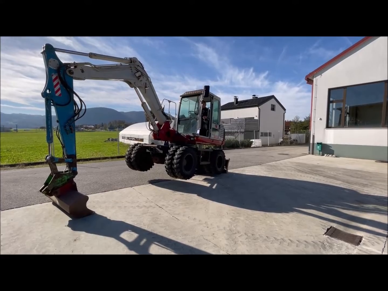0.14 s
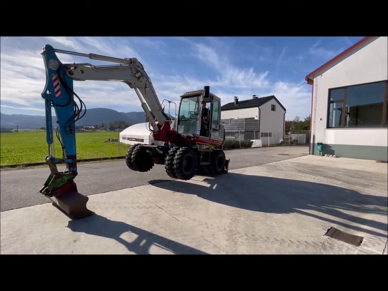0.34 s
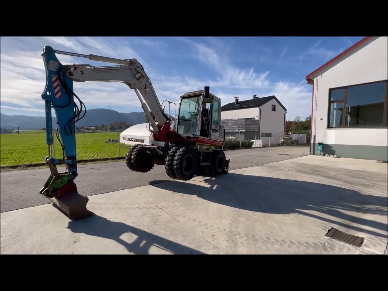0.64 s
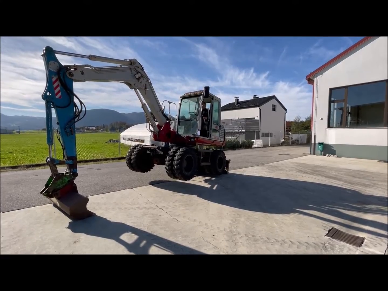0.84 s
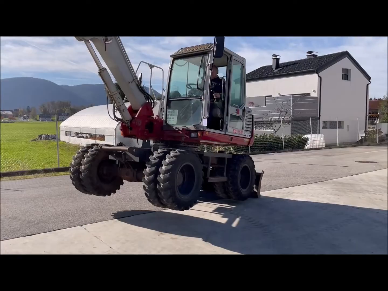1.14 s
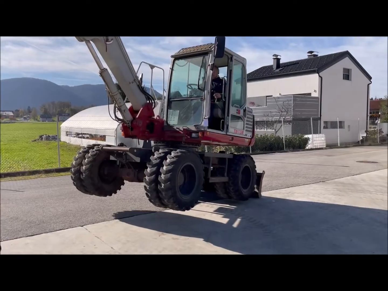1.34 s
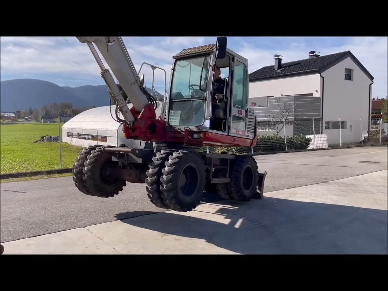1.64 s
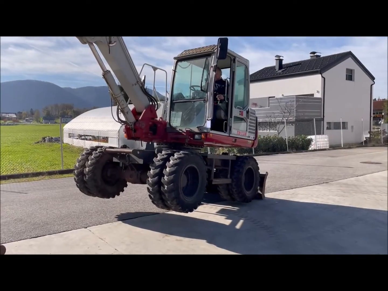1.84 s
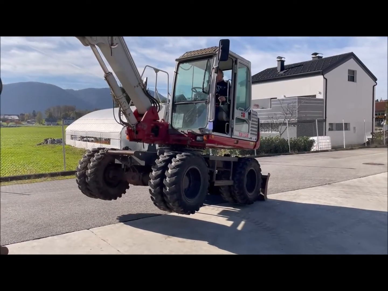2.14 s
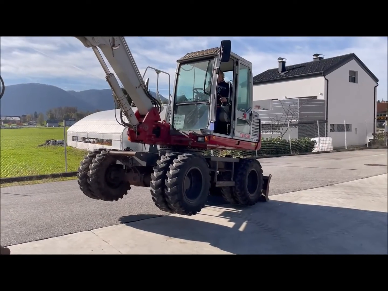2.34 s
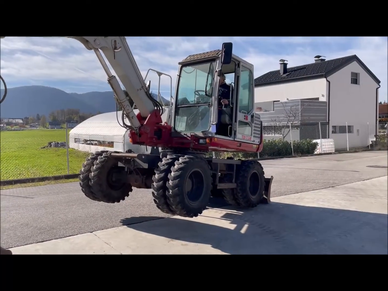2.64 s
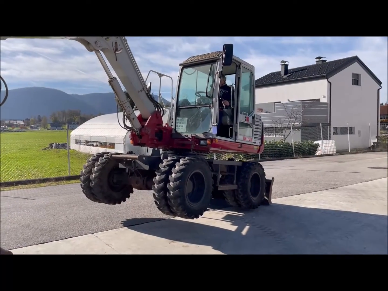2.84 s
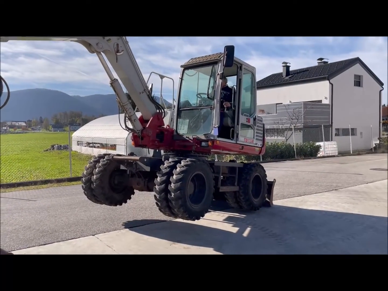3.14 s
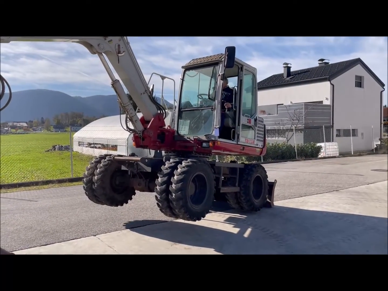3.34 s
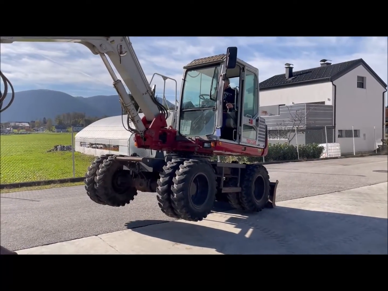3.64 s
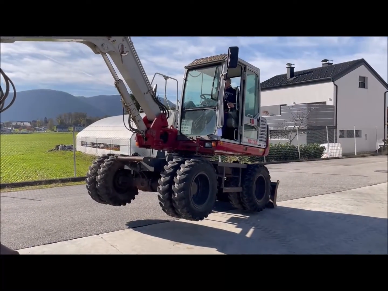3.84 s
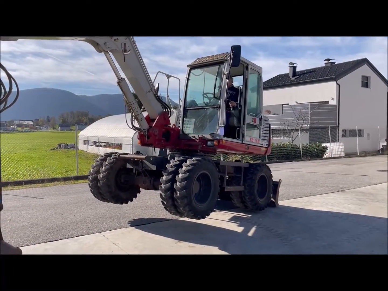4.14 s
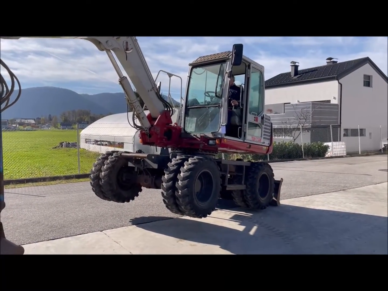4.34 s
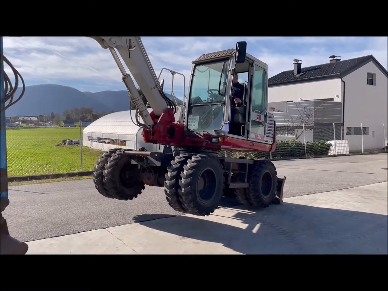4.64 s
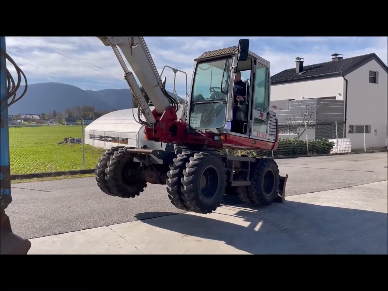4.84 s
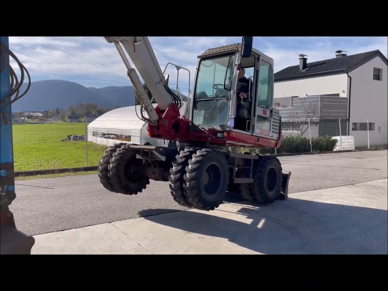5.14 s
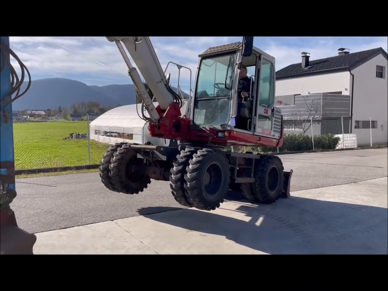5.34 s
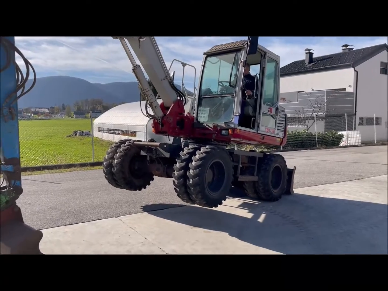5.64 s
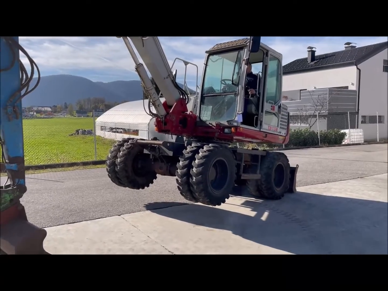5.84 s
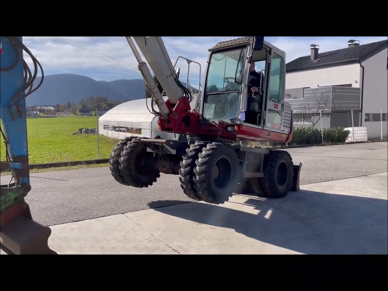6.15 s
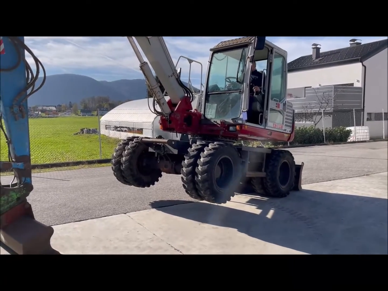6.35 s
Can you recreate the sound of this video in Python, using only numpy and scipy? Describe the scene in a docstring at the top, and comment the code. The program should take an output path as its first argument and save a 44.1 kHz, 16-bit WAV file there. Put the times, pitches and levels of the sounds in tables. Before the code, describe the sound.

A raised wheeled excavator runs with a steady rattling diesel beat, heard in stereo in the open air with brief soft wind buffets. The pump strains and hisses early on, the engine sagging slightly, with a few small ticks and a dull knock from the bucket. After quieter running, the pump strains again and the nearby steel bucket skids in a loud grinding judder with deep thumps, brief squeaks and bright stone pings.

```python
"""A four-cylinder diesel throbs and clatters: harmonics of the firing rate plus struck, damped modes.
It belongs to a wheeled excavator holding itself off a concrete yard on its bucket; its speed sags
and its pump whines and hisses under load, while gusts of filtered noise buffet the microphone.
A few faint slips of the bucket precede a long judder across the concrete: random grains crack
and grind, and narrow bands of noise and decaying sines make the steel clank, boom and ring."""
import sys
import numpy as np
from scipy import signal
from scipy.fft import rfft, irfft
from scipy.io import wavfile
from scipy.ndimage import uniform_filter1d

SR = 44100
rng = np.random.default_rng(int(sys.argv[2]) if len(sys.argv) > 2 else 0)


def digitize_waveform(pressure):
    """Quantize a signal to 16-bit integers and store it at the path in sys.argv[1].

    Rows of a 2-D input are taken as channels; values are limited to [-1, 1].
    """
    field = np.atleast_2d(pressure).T
    bounded = np.clip(field, -1, 1)
    quanta = np.round(bounded * 32767).astype(np.int16)
    wavfile.write(sys.argv[1], SR, quanta)


N = 286650
TIME = np.arange(N) / SR  # s
FREQS = np.arange(N // 2 + 1) * SR / N  # Hz


def from_db(db):
    """Logarithmic level: 20 dB is a factor of ten in amplitude."""
    return 10 ** (np.asarray(db) / 20)


def rms_one(x):
    """Power normalisation: scale to a root mean square of 1."""
    return x / np.sqrt(np.mean(x ** 2) + 1e-20)


def in_time(rows):
    """Linear interpolation: each column of a curve at every sample."""
    s, *columns = np.transpose(rows)
    return [np.interp(TIME, s, column) for column in columns]


def over_hz(points):
    """Interpolation along logarithmic frequency: a spectrum table at every frequency."""
    hz, value = np.transpose(points)
    return np.interp(np.log(FREQS + 1), np.log(hz), value)


def drift(rate_hz):
    """Low-pass filtered noise: a slow random fluctuation of rms 1."""
    spectrum = rfft(rng.standard_normal(N)) / (1 + (FREQS / rate_hz) ** 2)
    return rms_one(irfft(spectrum, N))


def swell(at_s, hold_s, rise_db_per_s, fall_db_per_s):
    """Exponential growth and decay: a gain rises to 1 at a moment, holds and dies away."""
    before_s = np.maximum(at_s - TIME, 0)
    after_s = np.maximum(TIME - at_s - hold_s, 0)
    return from_db(-rise_db_per_s * before_s - fall_db_per_s * after_s)


def noise():
    """Incoherent sources: two unrelated white noises."""
    return rng.standard_normal((2, N))


def grit(per_s, spread_db):
    """Granular impact noise: random clicks of random height, with an adjustable spread of sizes."""
    sizes = from_db(spread_db * np.minimum(rng.exponential(1, N), 4))
    return noise() * sizes * (rng.random(N) < per_s / SR)


def ring(clicks, hz, t60):
    """Damped resonator: a unit click sets off a decaying sine of initial height 1."""
    radius = from_db(-60 / (t60 * SR))
    angle = 2 * np.pi * hz / SR
    return signal.lfilter([0, np.sin(angle)], [1, -2 * radius * np.cos(angle), radius ** 2], clicks + 1e-18)


# scattered sound of the machine against its direct sound at two ports: columns f/Hz, level/dB
SPREAD = [(40, 6), (150, -10.5), (350, -12), (600, -4.5), (1100, -2.5), (1550, -7.5), (2200, -7),
          (3000, -5.5), (5000, -6), (8000, -31), (15000, -12)]


def colour(pair, spectrum, peaks=(), spread=SPREAD):
    """Resonant filtering: shape direct and scattered signals into left and right; joint rms 1."""
    low_hz, high_hz = spectrum[0][0], spectrum[-1][0]
    gain = from_db(over_hz(spectrum))
    gain = gain / (1 + (FREQS / high_hz / 1.3) ** 6)
    gain = gain / (1 + (low_hz / 1.5 / (FREQS + 1)) ** 4)
    for hz, width, db in peaks:
        gain = gain * (1 + (from_db(db) - 1) / np.hypot(1, 2 * (FREQS - hz) / width))
    scattering = [np.ones(len(FREQS)), from_db(over_hz(spread))]
    mid, side = irfft(rfft(pair) * gain * scattering, N)
    return rms_one(np.array([mid + side, mid - side]))


def strikes(cycles, place, uneven_db, jitter_s):
    """Periodic impact: a click at one crank angle of every cycle, uneven in time and force."""
    s = np.interp(np.arange(int(cycles[-1]) + 1) + place % 1, cycles, TIME)
    chance = rng.standard_normal((len(s), 2))
    at = np.round((s + jitter_s * chance[:, 0]) * SR).astype(int)
    inside = (at >= 0) & (s < TIME[-1]) & (at < N)
    clicks = np.zeros(N)
    clicks[at[inside]] = from_db(uneven_db * chance[inside, 1])
    return clicks


def contacts(cycles, places, t60):
    """Periodic impact noise: each crank angle repeats one short decaying noise burst of its own."""
    age = TIME[:SR // 20]
    out = np.zeros((2, N + SR // 20))
    for place in places:
        tick = rng.standard_normal((2, len(age))) * from_db(-60 * age / t60 + rng.normal(0, 1))
        clicks = strikes(cycles, place, uneven_db=0.5, jitter_s=.00001)
        for at in np.flatnonzero(clicks):
            out[:, at:at + len(age)] += clicks[at] * tick
    return out[:, :N]


# effort of the hydraulic pump, which loads the engine: columns t/s, load (0-1)
LOAD = [(0, .18), (.4, .13), (.75, .37), (1.06, .38), (1.6, .94), (2.3, .98), (2.41, .5), (2.82, .13),
        (3.14, .13), (3.84, .52), (4.15, .19), (5.1, .06), (5.3, .95), (6.1, .85), (6.4, .2)]
FREE_FIRINGS_PER_S, FULL_LOAD_SAG_PER_S = 47.6, 1.6


def crank(load):
    """Speed droop: load lowers the firing rate, whose integral counts the firings."""
    firing_hz = FREE_FIRINGS_PER_S - FULL_LOAD_SAG_PER_S * load
    return np.cumsum(firing_hz * (1 + .0004 * drift(4))) / SR


# exhaust tones: columns multiple of the firing rate, relative level/dB
EXHAUST = [(1.5, -26), (2, 3.5), (2.5, -19), (3, -9), (3.5, -25), (4, -11), (5, -30.5), (6, -20),
           (7, -23.5), (8, -24), (9, -22.5)]
# base levels and their rise at full load, dB
EXHAUST_DB, EXHAUST_RISE_DB = -26.5, 4
THROB_DB, THROB_RISE_DB = -26.5, 1


def exhaust(firings, load):
    """Harmonic synthesis: a throb at the firing rate under pipe tones that swell more with load."""
    tones = 0
    for order, db in EXHAUST:
        tones = tones + from_db(db + .7 * drift(6)) * np.sin(2 * np.pi * order * firings)
    throb_db = THROB_DB + THROB_RISE_DB * load + drift(6.9)
    throb = from_db(throb_db) * np.cos(2 * np.pi * firings)
    return from_db(EXHAUST_DB + EXHAUST_RISE_DB * load) * tones + throb


# hum of the engine block: columns multiple of the firing rate, level/dB
HUM = [(11.5, -42.5), (12.5, -40), (13, -41), (13.5, -44.5), (14, -41), (16, -50), (18.5, -57), (19, -50),
       (20, -51.5)]


def hum(firings):
    """Engine-order radiation: the block hums at fixed multiples of the firing rate."""
    out = 0
    for order, db in HUM:
        phase = 2 * np.pi * (order * firings + rng.random())
        out = out + from_db(db + drift(5.8)) * np.sin(phase)
    return out


WHISTLE_HZ, WHISTLE_WANDER_HZ = 1527, 4.14
WHISTLE_DB, WHISTLE_FLICKER_DB = -43, 0.5


def whistle():
    """Frequency and amplitude modulation: a thin tone, independent of load, wanders and flickers."""
    turns = np.cumsum(WHISTLE_HZ + WHISTLE_WANDER_HZ * drift(12.5)) / SR
    level_db = WHISTLE_DB + WHISTLE_FLICKER_DB * drift(35) + 1.1 * drift(1.2)
    return from_db(level_db) * np.sin(2 * np.pi * turns)


# valve gear and injection clatter: columns f/Hz, density level/dB per Hz
CLATTER = [(150, 5.5), (220, 1.5), (370, -1.5), (600, 4), (820, -7.5), (1200, -5.5), (1600, -3),
           (1850, -7.5), (2400, -10), (2750, -11.5), (3500, -15), (5000, -21), (8000, -32.5)]
# ringing panels: columns f/Hz, width/Hz, level/dB
PANELS = [(345, 54, 1.5), (533, 20, 0.5), (900, 31, 9), (1260, 36, -5.5), (1620, 240, 3.5), (1880, 83, -13),
          (2140, 98, 2.5), (2800, 7.8, -0.5)]
CLATTER_DB, CLATTER_RISE_DB = -36, 0.5  # base level and its rise at full load


def clatter(firings, load, t60=0.036, count=20):
    """Impact excitation of resonances: twenty contacts a cycle rattle the panels."""
    places = (np.arange(count) + rng.random(count)) / count
    rattle = colour(contacts(firings / 4, places, t60), CLATTER, PANELS)
    surge = from_db(0.87 * np.cos(2 * np.pi * (firings - .15)))  # strongest just after each firing
    return from_db(CLATTER_DB + CLATTER_RISE_DB * load) * surge * rattle


# knocks of the four cylinders: columns place in the four-stroke cycle (0-1), force level/dB
KNOCKS = [(0.015, -0.5), (0.264, 0.3), (0.514, 1), (0.765, -0.8)]
# modes of the block: columns f/Hz, t60/s, lag after the knock/s,
# level/dB for an outer cylinder, level/dB for an inner one
BLOCK = [(346, .022, 0.0013, -38.5, -30), (449, 0.022, 0.00082, -39.5, -30.5),
         (560, 0.025, .0007, -32.5, -35.5), (640, 0.032, .0001, -32.5, -34.5),
         (740, 0.012, 0.0015, -41, -35.5), (898, 0.037, 0.00017, -45, -46), (1130, 0.028, 0.0019, -40, -49),
         (1330, .014, .0014, -42.5, -36), (1490, 0.012, 0.0017, -42, -36), (1670, 0.022, .0005, -44, -37),
         (2050, 0.013, 0.0023, -45, -40), (2176, 0.022, 0.0015, -45, -41), (3110, .016, .0012, -49, -46)]


def knocks(cycles):
    """Modal excitation: outer and inner cylinders alternate and drive block modes differently."""
    out = 0
    for k, (place, force_db) in enumerate(KNOCKS):
        clicks = strikes(cycles, place, uneven_db=1.0, jitter_s=.00002)
        for hz, t60, lag_s, *mode_db in BLOCK:
            gain = from_db(force_db + mode_db[k % 2] + rng.normal(0, 1.0, (2, 1)))
            out = out + gain * ring(np.roll(clicks, round(lag_s * SR)), hz, t60)
    return out


# colour of the injector ticks: columns f/Hz, density level/dB per Hz
INJECTION = [(900, -19), (1400, -3.5), (1700, 3), (1900, -2), (2200, 2.5), (2550, -5.5), (2900, -13),
             (4000, -14), (6000, -20)]
INJECTION_LEAD = .06  # share of the cycle
INJECTION_T60_S, INJECTION_DB = 0.052, -44.5


def injectors(cycles):
    """Periodic impact noise: an injector ticks brightly just ahead of each knock."""
    places = [place - INJECTION_LEAD for place, _ in KNOCKS]
    return from_db(INJECTION_DB) * colour(contacts(cycles, places, INJECTION_T60_S), INJECTION)


# loose covers: columns place in the cycle (0-1), f/Hz, t60/s, level/dB
RATTLES = [(0.061, 618, 0.069, -43), (.17, 2180, 0.044, -44), (.3, 1670, 0.042, -39.5),
           (.5, 1110, 0.069, -40.5), (.55, 898, 0.075, -41), (.71, 2520, 0.049, -46)]


def rattles(cycles):
    """Repeated modal impact: loose covers are each shaken once a cycle and ring on."""
    out = 0
    for place, hz, t60, db in RATTLES:
        clicks = strikes(cycles, place, uneven_db=2.0, jitter_s=.00002)
        out = out + from_db(db) * ring(clicks, hz, t60)
    return out


# cooling air: columns f/Hz, density level/dB per Hz
AIR = [(25, -6), (50, 10), (120, -5), (260, 5), (330, 3.5), (420, -1), (620, 1.5), (1000, -5), (2200, -3),
       (3200, -11), (5000, -16.5), (7000, -17.5), (10000, -20.5), (13000, -22), (15000, -23)]
AIR_DB, AIR_RISE_DB = -41, 1.7  # base level and its rise at full load


def cooling_air(load):
    """Broadband flow noise: filtered noise whose level rises with load."""
    return from_db(AIR_DB + AIR_RISE_DB * load) * colour(noise(), AIR)


# chassis rumble: columns f/Hz, density level/dB per Hz
CHASSIS = [(28, -36), (42, -10), (70, -1.5), (105, -2.5), (150, -7), (220, -25.5), (400, -41)]
# nearer bucket, scattered against direct sound at the two ports: columns f/Hz, level/dB
BUCKET_SPREAD = [(80, -20), (200, -18), (400, -12), (800, -7.5), (1250, -4.5), (1800, -0.5), (2600, -8),
                 (4500, -3.5), (8000, -20)]
RUMBLE_DB, RUMBLE_RISE_DB = -34.5, 3.5  # level about which it pulses, and its rise at full load


def chassis(firings, load, pulse_db=5.0):
    """Amplitude-modulated low noise: the raised machine rumbles with each firing, more under load."""
    pulse = pulse_db * np.cos(2 * np.pi * (firings - .3))
    rumble = colour(noise(), CHASSIS, spread=BUCKET_SPREAD)
    return from_db(RUMBLE_DB + RUMBLE_RISE_DB * load + pulse) * rumble


# pump whine: columns multiple of the firing rate, relative level/dB
PUMP = [(12, -33.5), (20, -46), (24, -42.5), (34, -44), (48, -40)]
# oil hissing through a valve: columns f/Hz, density level/dB per Hz
OIL = [(1300, 10.5), (2200, 12), (3000, -7), (4000, -10), (5600, -19), (6700, 1.5), (8000, -13),
       (12000, -34), (16000, -27)]
# short spells of a droning hydraulic line: columns t/s, length/s, level/dB
DRONE = [(1.686, 0.287, -33), (2.066, 0.035, -31.5), (2.205, 0.013, -35.5), (5.23, 0.11, -45)]
PUMP_ONSET_POWER = 1.18  # whine and hiss grow as this power of the load
DRONE_RISE_DB_PER_S, DRONE_FALL_DB_PER_S = 380, 600


def hydraulics(firings, load):
    """Flow ripple and turbulence: whine and hiss grow with load; a line drones in set spells."""
    whine = 0
    for order, db in PUMP:
        whine = whine + from_db(db + 2.5 * drift(8)) * np.sin(2 * np.pi * order * firings)
    hiss = colour(noise(), OIL)
    spells = 0
    for s, length, db in DRONE:
        spells = spells + from_db(db) * swell(s, length, DRONE_RISE_DB_PER_S, DRONE_FALL_DB_PER_S)
    drone = spells * from_db(1.5 * drift(12)) * np.sin(2 * np.pi * 6 * firings)
    return load ** PUMP_ONSET_POWER * (from_db(-3.5) * whine + from_db(-41.0) * hiss) + drone


# gusts on the microphone: columns t/s, hold/s, level/dB
GUSTS = [(0.016, .04, -30), (0.357, 0.15, -28.5), (1.164, 0.12, -24.5), (2.385, 0.044, -25),
         (2.856, 0.27, -29.5), (3.3, 0.12, -25.5), (4.3, 0.15, -26.5), (4.777, 0.11, -26.5),
         (5.194, 0.057, -30)]
# colour of the wind: columns f/Hz, density level/dB per Hz
WIND = [(34, -20), (48, -1), (75, 2.5), (120, -1), (190, -13.5), (280, -21.5), (450, -27)]
# separate eddies at each port, side against mid: columns f/Hz, level/dB
WIND_SPREAD = [(50, -2), (200, 0)]
GUST_RISE_DB_PER_S, GUST_FALL_DB_PER_S = 164, 100


def wind():
    """Turbulent pressure noise: gusts add in power and differ between the ports."""
    power = 0
    for s, hold, db in GUSTS:
        gust = from_db(db) * swell(s, hold, GUST_RISE_DB_PER_S, GUST_FALL_DB_PER_S)
        power = power + gust ** 2
    return np.sqrt(power) * colour(noise(), WIND, spread=WIND_SPREAD)


def crumbs(per_s, spread_db, cycles, count=38):
    """Random modal impacts: bursting stones, each click ringing briefly at one of many pitches."""
    clicks = grit(per_s, spread_db)
    dealt = rng.integers(0, count, N)
    out = 0
    for k, hz in enumerate(np.geomspace(220, 15000, count)):
        out = out + hz * ring(clicks * (dealt == k), hz, cycles / hz)  # t60 lasts this many cycles
    return out


CRUSH_ATTACK_S, CRUSH_HOLD_S = .0012, .007


def crush(age, t60):
    """Exponential onset and decay: stones give way over a moment, then the sound dies."""
    attack = 1 - np.exp(-age / CRUSH_ATTACK_S)
    return attack * from_db(-60 * np.maximum(age - CRUSH_HOLD_S, 0) / t60)


def shell_ring(age, hz, width, t60):
    """High modal density: close shell modes around one pitch, as band noise, make a rough thud."""
    edges = [hz / (1 + width / 2), hz * (1 + width / 2)]
    band = signal.butter(2, edges, "band", fs=SR, output="sos")
    return crush(age, t60) * rms_one(signal.sosfilt(band, rng.standard_normal(len(age))))


def contact_point(sound, uneven_db):
    """Position-dependent modal coupling: each contact favours random peaks about 100 Hz wide."""
    spectrum = rfft(sound)
    smoothing = np.hanning(sound.shape[1] // 220 + 3)
    favour = signal.fftconvolve(rng.standard_normal(spectrum.shape[1]), smoothing, "same")
    return irfft(spectrum * rms_one(from_db(uneven_db * rms_one(favour))), sound.shape[1])


# slips of the bucket: columns t/s, crack level/dB, clank level/dB, main ring f/Hz, crack t60/s
SLIPS = [(2.135, -35, -33, 547, .08), (2.262, -30, -36, 540, 0.073), (2.297, -28.5, -32, 1000, 0.13),
         (2.311, -32.5, -30, 610, 0.25), (2.335, -36, -36, 374, 0.12), (2.386, -33, -33, 716, 0.031),
         (2.495, -28, -35, 616, 0.04), (2.849, -40, -35, 695, .09), (5.355, -24.5, -36, 600, 0.084),
         (5.368, -29, -16, 766, 0.11), (5.436, -17.5, -13, 600, 0.16), (5.465, -27, -27, 611, 0.12),
         (5.515, -21.5, -24, 755, 0.34), (5.562, -14.5, -13.5, 1040, 0.13), (5.622, -17.5, -12, 565, 0.12),
         (5.647, -23, -11, 640, 0.13), (5.678, -11, -14, 486, 0.14), (5.722, -20, -34, 640, 0.33),
         (5.76, -10.5, -7, 734, 0.22), (5.794, -24, -8.5, 645, 0.074), (5.882, -29, -13.5, 1260, 0.1),
         (5.912, -21.5, -10, 635, 0.072), (5.958, -33, -8, 760, 0.091), (6.046, -38, -16.5, 650, .09),
         (6.071, -20, -15, 950, 0.023), (6.116, -38, -14, 750, 0.08), (6.215, -24, -17.5, 1010, 0.15),
         (6.279, -29, -22, 833, 0.049), (6.371, -23, -23, 1057, 0.098)]
# cracking grit: columns f/Hz, density level/dB per Hz
CRACK = [(1200, -13), (2600, 0), (4000, -2), (6000, -8.5), (8000, -11.5), (11000, -20.5), (16000, -25)]
# grinding, which also colours the clanks: columns f/Hz, density level/dB per Hz
GRIND = [(200, -0.5), (400, 0.5), (640, 0), (850, -3.5), (1150, -1), (1500, -9), (2100, -11), (3000, -19.5),
         (5000, -30), (8000, -39), (15000, -63)]
# steel resonances of the bucket: columns f/Hz, width/Hz, level/dB
BUCKET = [(640, 50, 5), (815, 50, 2), (2560, 140, 2), (3210, 36, 3), (3830, 54, 2), (6440, 110, -2)]
# offsets added to the levels of every slip, dB
CRACK_DB, CLANK_DB, RING_DB = -6, -2, -5.5
CLANK_T60_S, RING_T60_S = 0.22, 0.19
RING_WIDTH = 0.38  # share of the ring frequency


def slips(stones):
    """Stick-slip release: each slip cracks grit and clanks steel that rings at its own pitch."""
    cracking = colour(stones, CRACK, BUCKET, BUCKET_SPREAD)
    clanking = colour(grit(per_s=6000, spread_db=1.2), GRIND, BUCKET, BUCKET_SPREAD)
    out = np.zeros((2, N))
    for s, crack_db, clank_db, hz, t60 in SLIPS:
        start = round(s * SR)
        span = slice(start, start + SR // 3)
        age = TIME[:len(TIME[span])]
        crack = from_db(crack_db + CRACK_DB) * crush(age, t60) * cracking[:, span]
        clank = from_db(clank_db + CLANK_DB) * crush(age, CLANK_T60_S) * clanking[:, span]
        thud = from_db(clank_db + RING_DB) * shell_ring(age, hz, RING_WIDTH, RING_T60_S)
        out[:, span] += contact_point(crack + clank, uneven_db=4.0) + thud
    return out


# hollow thuds as the edge breaks loose: columns t/s, f/Hz, relative width, t60/s, level/dB
BREAKS = [(2.311, 640, .4, 0.096, -21.5), (2.303, 370, 0.42, .17, -30.5), (5.369, 720, 0.62, .17, -17.5)]


def breaks():
    """Released modal energy: the edge breaks loose with hollow thuds of band noise."""
    out = 0
    for s, hz, width, t60, db in BREAKS:
        out = out + from_db(db) * shell_ring(np.maximum(TIME - s, 0), hz, width, t60)
    return out


# jolts as the bucket catches: columns t/s, f/Hz, level/dB
JOLTS = [(2.335, 84, -34), (2.389, 96, -33), (5.203, 78, -12), (5.562, 174, -14), (5.595, 131, -9.5),
         (5.645, 214, -3.5), (5.659, 99, -13), (5.669, 227, -8), (5.731, 120, -9), (5.789, 194, -13),
         (5.862, 171, -11), (5.901, 90, -1), (5.967, 207, -5.5), (6.058, 83.4, -10), (6.135, 96, -11)]
JOLT_T60_S = 0.091


def jolts():
    """Damped low modes: each catch thumps the boom and chassis, which radiate no deep bass."""
    thumps = 0
    for s, hz, db in JOLTS:
        click = from_db(db) * signal.unit_impulse(N, round(s * SR))
        thumps = thumps + ring(click, hz, JOLT_T60_S)
    return signal.sosfilt(signal.butter(2, 55, "high", fs=SR, output="sos"), thumps)


# stone chips pinging off the edge: columns t/s, f/Hz, t60/s, level/dB
PINGS = [(2.496, 4850, 0.015, -35), (5.882, 1230, 0.06, -10), (5.914, 2500, 0.032, -8),
         (6.073, 2490, 0.023, -10.5), (6.211, 2520, 0.079, -22), (6.358, 2450, 0.043, -27),
         (6.371, 6300, 0.16, -35)]


def pings():
    """Free damped vibration: stone chips ping off the edge as decaying sines."""
    out = 0
    for s, hz, t60, db in PINGS:
        out = out + ring(from_db(db) * signal.unit_impulse(N, round(s * SR)), hz, t60)
    return out


# boom of the bucket shell: columns f/Hz, density level/dB per Hz
BOOM = [(50, -4), (90, 5), (130, 2.5), (205, 2.5), (260, -3.5), (335, -1.5), (420, -21), (700, -41)]
DRAG_FULL_S, DRAG_HOLD_S = 5.582, 0.36  # start and length of the loudest stretch
DRAG_SPAN_S, DRAG_FADE_S = (5.32, 6.45), 0.047  # the edge is moving from, to; fade at each end
BOOM_DB, BOOM_RISE_DB_PER_S, BOOM_FALL_DB_PER_S = -12, 73, 48
GRIND_DB, GRIND_RISE_DB_PER_S, GRIND_FALL_DB_PER_S = -16.5, 76, 49


def drag(stones):
    """Sliding friction: the edge grinds on the concrete and the shell booms."""
    start, stop = DRAG_SPAN_S
    moving = np.clip(np.minimum(TIME - start, stop - TIME) / DRAG_FADE_S, 0, 1)
    grind_swell = swell(DRAG_FULL_S, DRAG_HOLD_S, GRIND_RISE_DB_PER_S, GRIND_FALL_DB_PER_S)
    boom_swell = swell(DRAG_FULL_S, DRAG_HOLD_S, BOOM_RISE_DB_PER_S, BOOM_FALL_DB_PER_S)
    grind = from_db(GRIND_DB) * grind_swell * colour(stones, GRIND, BUCKET, BUCKET_SPREAD)
    grains = grit(per_s=1500, spread_db=0.5)
    boom = from_db(BOOM_DB) * boom_swell * colour(grains, BOOM, spread=BUCKET_SPREAD)
    return moving * (grind + boom)


# squeaks of the edge on stones: columns t/s, length/s, from f/Hz, to f/Hz, level/dB
SQUEAKS = [(5.513, 0.034, 4000, 2290, -29), (5.544, 0.031, 1704, 1130, -23)]


def squeaks(rough=0.43):
    """Friction-driven oscillation: rough squeaks glide down as the edge slows on a stone."""
    out = np.zeros(N)
    grain = 1 + rough * drift(250)
    for s, length, from_hz, to_hz, db in SQUEAKS:
        at, size = round(s * SR), round(length * SR)
        turns = np.cumsum(np.geomspace(from_hz, to_hz, size)) / SR
        out[at:at + size] += from_db(db) * np.hanning(size) * np.sin(2 * np.pi * turns)
    return out * grain


def bucket():
    """Superposition of contact sounds: slips, thuds, jolts, chips, drag and squeaks."""
    stones = crumbs(per_s=24000, spread_db=-0.3, cycles=30)
    return slips(stones) + breaks() + jolts() + pings() + drag(stones) + squeaks()


def scene():
    """Superposition under a common load: it slows the crank and raises the engine and pump sounds."""
    load, = in_time(LOAD)
    firings = crank(load)
    cycles = firings / 4  # four firings to a four-stroke cycle
    tones = exhaust(firings, load) + hum(firings) + whistle()
    block = clatter(firings, load) + knocks(cycles) + injectors(cycles) + rattles(cycles)
    engine = tones + block + cooling_air(load)
    return engine + chassis(firings, load) + hydraulics(firings, load) + wind() + bucket()


LIMIT_DB, LIMIT_WINDOW_S = -10.5, 0.051


def gain_control(sound):
    """Peak-hold limiting: short-term power above the limit lowers the gain, which stays down."""
    power = uniform_filter1d(np.mean(sound ** 2, axis=0), int(LIMIT_WINDOW_S * SR))
    over_db = np.maximum(10 * np.log10(np.abs(power) + 1e-18) - LIMIT_DB, 0)
    return sound * from_db(-np.maximum.accumulate(over_db))


# left port against right: columns f/Hz, level/dB
PORT_BALANCE = [(200, 0.5), (700, -1), (1300, -2), (2400, -1.1), (4400, 2.5), (8000, 0), (15000, -0.5)]
# colour of the wide pickup: columns f/Hz, level/dB
WIDE_SHOT = [(100, -1.5), (600, 0), (1200, -1), (2400, -0.5), (4000, -4.5), (6000, -1.5), (9000, 4.5),
             (12500, -2), (15000, -20)]
# gain of the wide pickup's side signal: columns f/Hz, level/dB
WIDE_SIDE = [(100, 0.59), (400, 2.7), (1300, 4.3), (2400, 1.8), (4400, 7.6), (15000, 22)]
# phase between the ports of the close pickup: columns f/Hz, phase/turns
PORT_TURNS = [(20, 0), (5500, 0), (6600, .17), (8200, .5), (9300, .66), (10500, .95), (12300, 1.03),
              (14000, 1.47), (16000, 1.5)]
WIDE_LAG_S = .00002  # the right port hears a little later
ZOOM_S, CUTOFF_HZ = 1.15, 15900


def record(dry):
    """Two-port interference: the microphone zooms from wide to narrow, with treble phase shifts."""
    sides = np.array([[1], [-1]])
    balanced = rfft(dry) * from_db(sides * over_hz(PORT_BALANCE) / 2)
    left, right = balanced
    mid, side = (left + right) / 2, (left - right) / 2
    widened = mid + sides * side * from_db(over_hz(WIDE_SIDE))
    wide_lag = np.exp(1j * np.pi * FREQS * WIDE_LAG_S * sides)
    wide = irfft(widened * from_db(over_hz(WIDE_SHOT)) * wide_lag, N)
    close = irfft(balanced * np.exp(-1j * np.pi * over_hz(PORT_TURNS) * sides), N)
    zoomed = np.clip((TIME - ZOOM_S) * 20 + .5, 0, 1)  # a crossfade of 0.05 s
    heard = gain_control(wide + zoomed * (close - wide))
    rounded = heard / (1 + (heard / 1.05) ** 4) ** .25  # soft saturation of the highest peaks
    return irfft(rfft(rounded) / (1 + (FREQS / CUTOFF_HZ) ** 200), N)


dry = scene()
out = record(dry)
digitize_waveform(out)
```